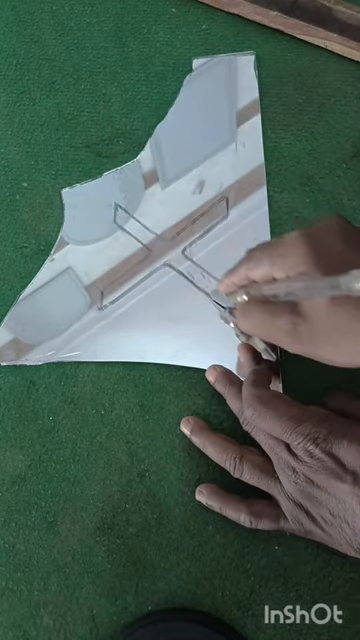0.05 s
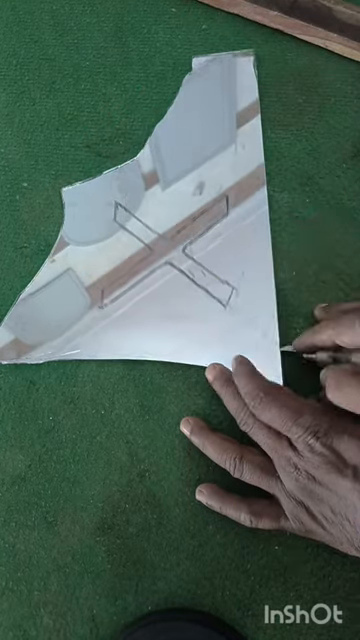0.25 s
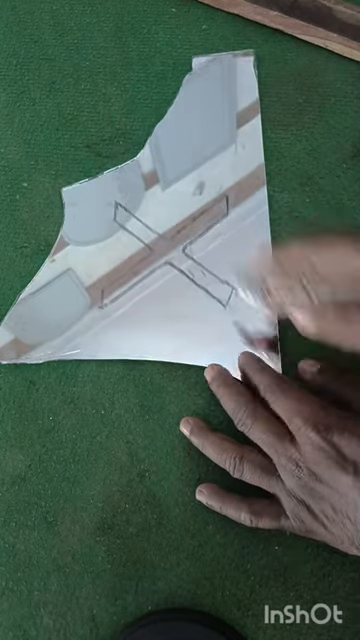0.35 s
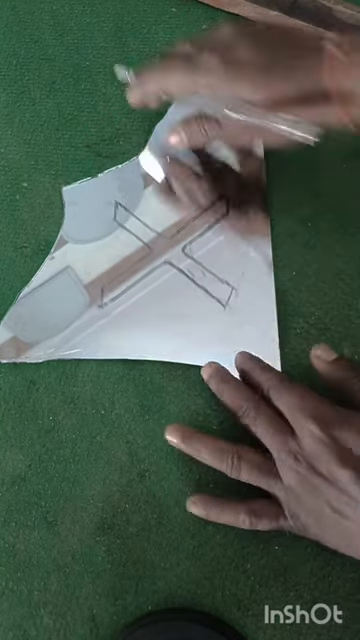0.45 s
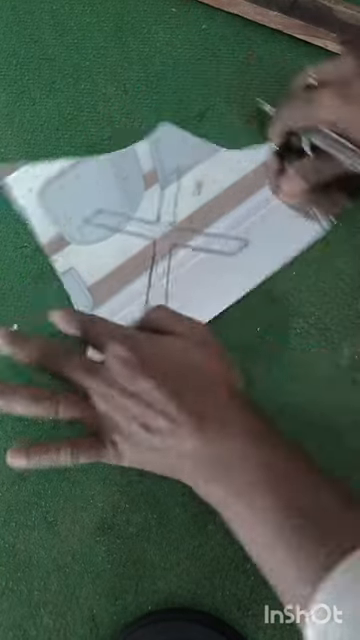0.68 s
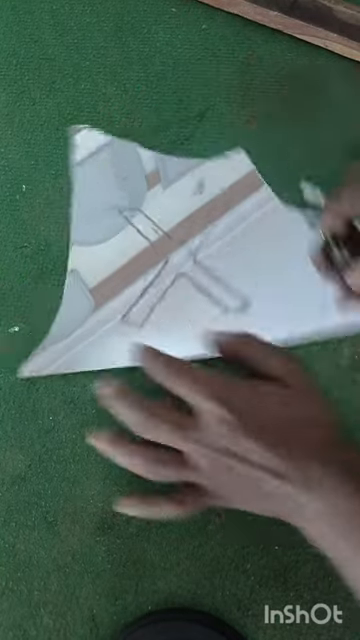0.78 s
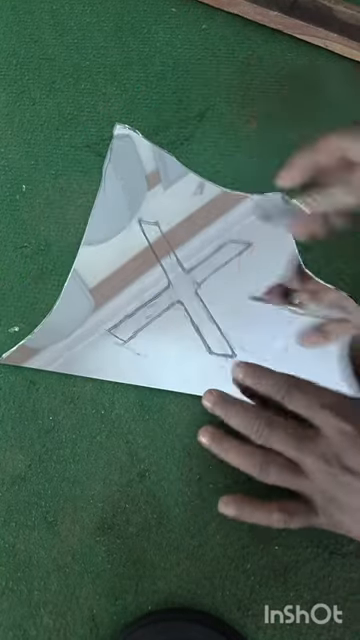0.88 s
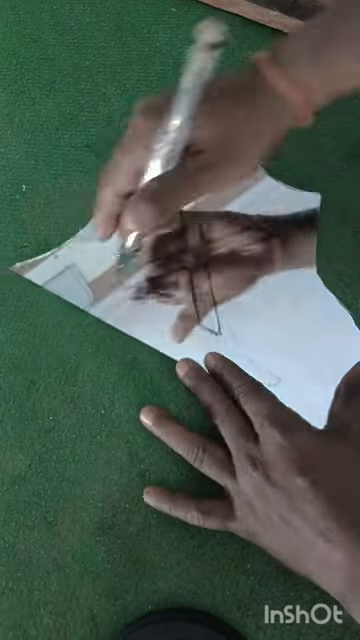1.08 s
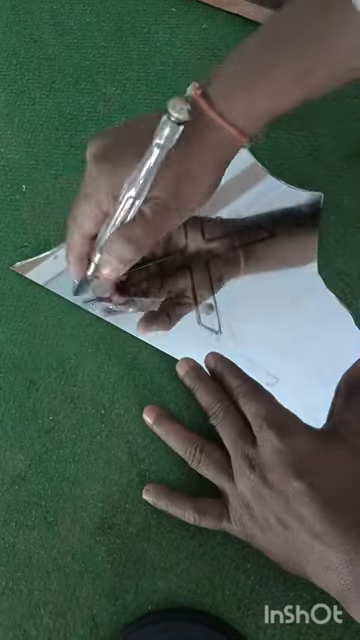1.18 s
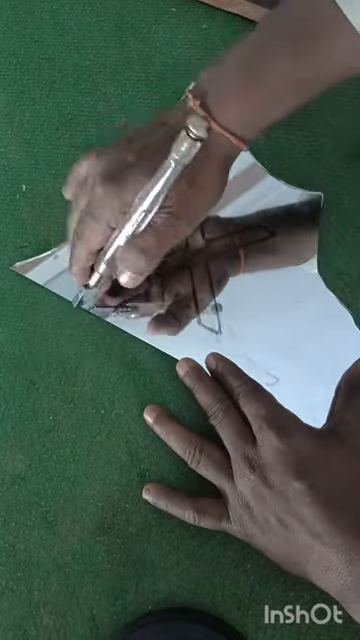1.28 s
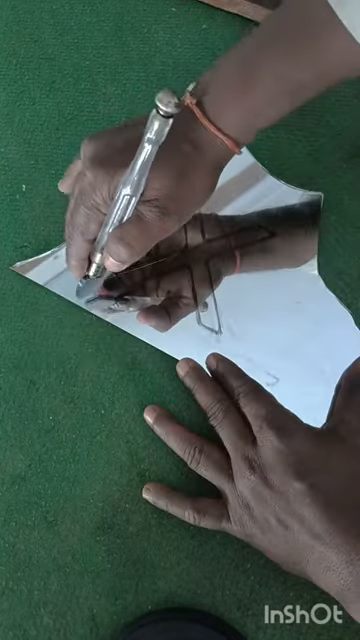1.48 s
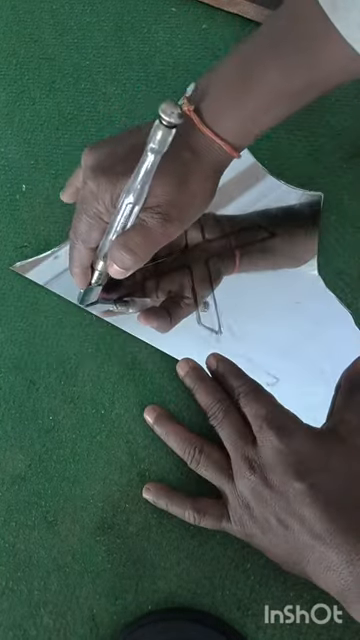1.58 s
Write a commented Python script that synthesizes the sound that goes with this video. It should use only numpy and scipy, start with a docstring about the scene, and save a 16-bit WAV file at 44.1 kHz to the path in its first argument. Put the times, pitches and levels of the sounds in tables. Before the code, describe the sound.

A glass cutter scratches briefly across a mirror and drops off the edge with a sharp crack and a table thud. Fingers turn the clinking glass on cloth, then the cutter is set down. Close, with faint street rumble.

```python
"""A workbench in a small room, heard close up by two spaced microphone ports, street rumble behind.
A wheel cutter chips the last of its score across a piece of mirror, drops off the edge with a crack
and a thud of the table, and bounces. A faint horn starts up far outside and sounds on and off.
Fingers pick at the mirror and turn it on the cloth, the glass ringing briefly at each touch.
Last, the cutter is set down again."""
import sys
import numpy as np
from scipy import signal
from scipy.io import wavfile

SR = 44100
rng = np.random.default_rng(int(sys.argv[2]) if len(sys.argv) > 2 else 0)


def unload_audio(sound):
    """Save the sound as a 16-bit wav file, at the path given as the first command line argument."""
    columns = np.transpose(np.atleast_2d(sound))
    # keep every value between -1 and 1, then stretch to whole-number steps
    steps = np.round(np.clip(columns, -1, 1) * 32767)
    wavfile.write(sys.argv[1], SR, steps.astype(np.int16))


N = 72765
TIME = np.arange(N) / SR
OWN_GRIT = 1.44   # grit heard at one port only, relative to the grit both share


def from_db(db):
    """Decibels to gain."""
    return 10 ** (np.asarray(db) / 20)


def unit_rms(x):
    """Scale to rms 1."""
    return x / np.sqrt(np.mean(x ** 2) + 1e-20)


def level_curve(rows):
    """Gain at every sample from (seconds, dB) points."""
    return from_db(np.interp(TIME, *np.transpose(rows)))


def at_hz(rows, hz):
    """Read (Hz, value) points on a log-frequency axis."""
    freqs, values = np.transpose(rows)
    return np.interp(np.log(hz), np.log(freqs), values)


def band(x, low_hz, high_hz):
    """Butterworth band-pass."""
    edges = np.clip([low_hz, high_hz], 10, .45 * SR)
    return signal.sosfilt(signal.butter(2, edges, "band", fs=SR, output="sos"), x)


def drift(rate_hz):
    """Slow random wander of rms 1."""
    hop, run_in = 40, 2000
    pole = np.exp(-2 * np.pi * rate_hz * hop / SR)
    white = rng.standard_normal(N // hop + run_in + 2)
    slow = signal.lfilter([1], [1, -2 * pole, pole * pole], white)[run_in:]
    return np.interp(np.arange(N) / hop, np.arange(len(slow)), unit_rms(slow))


def ring(force, hz, t60):
    """One damped mode: a unit click starts a dying sine of height about 1."""
    pole, angle = from_db(-60 / (t60 * SR)), 2 * np.pi * hz / SR
    return signal.lfilter([0, np.sin(angle)], [1, -2 * pole * np.cos(angle), pole * pole], force + 1e-18)


def grains(shape, per_s, spread_db):
    """Random clicks of uneven size and sign."""
    heights = from_db(spread_db * np.minimum(rng.exponential(1, shape), 4))
    signs = rng.choice([-1, 1], shape)
    return heights * signs * (rng.random(shape) < per_s / SR)


# How alike the two spaced ports hear noise. Each row: frequency in Hz, likeness from 0 to 1.
PORT_LIKENESS = [(60, 1), (250, 1), (500, 1), (1000, 0.1), (3000, 0), (12000, .3)]

def two_port_noise(spectrum, flicker_db):
    """Third-octave bands of noise at both ports, each flickering mostly on its own; rms 1."""
    out, common_drift = 0, drift(4)
    edges = 25 * 2 ** np.arange(0, 9.4, 1 / 3)
    white = rng.standard_normal((2, 2, N + SR // 5))   # with a run-in
    for k, (low, high) in enumerate(zip(edges, edges[1:])):
        mid, side = band(white[k % 2], low, high)[:, -N:]
        hz = np.sqrt(low * high)
        alike = at_hz(PORT_LIKENESS, hz)
        gain = from_db(at_hz(spectrum, hz) + flicker_db * (.3 * common_drift + drift(12)))
        out = out + gain * (np.sqrt(1 + alike) * mid + np.sqrt(1 - alike) * side * [[1], [-1]])
    return unit_rms(out)


# The street from indoors. Each row: frequency in Hz, relative spectral density in dB.
STREET_SPECTRUM = [(24, -54), (40, -10), (86, -12.5), (152, -2.5), (203, -4.5), (223, -14), (425, -14.5),
                   (593, -18.5), (809, -17.5), (1100, -26), (1240, -25), (1780, -28.5), (2940, -31),
                   (3640, -40.5), (12000, -65), (15600, -118), (22000, -120)]
# Its rise and fall at the bench. Each row: time in seconds, level in dB.
STREET_LEVEL = [(0, -42), (.2, -43), (.4, -43), (.55, -41), (.7, -42.5), (.85, -40), (1.0, -43.5),
                (1.12, -44), (1.25, -42), (1.37, -42.5), (1.45, -41), (1.65, -40)]

def street(port_lag_s=.0005):
    """Rumble comes through the walls and reaches the left port a little late."""
    rumble = level_curve(STREET_LEVEL) * two_port_noise(STREET_SPECTRUM, flicker_db=1.2)
    rumble[0] = np.interp(TIME - port_lag_s, TIME, rumble[0])
    return rumble


# The cutter's stroke, close to the microphone. Each row: time in seconds, level in dB.
STROKE_LEVEL = [(0.0, -39), (0.09, -36.5), (0.18, -36.5), (0.206, -45), (0.21, -48)]
# Where the scored glass hisses. Each row: centre in Hz, width in Hz, relative level in dB at the
# top of its swell, time of that top in seconds.
HISS_BANDS = [(1947, 240, -5, 0.0465), (3310, 260, 0, .07), (4330, 300, -12.5, .13), (4990, 410, 2.5, .14),
              (6090, 390, -7, 0.15), (7460, 510, 2, 0.088), (8320, 250, 0.5, .085), (9260, 400, -5, .16),
              (12200, 400, -40, .07), (14200, 300, -6, .15), (14950, 400, -5, .11)]

def scoring(chips_per_s=4000, swell_s=.04, swell_db=5.5, wander_db=2.0):
    """The wheel chips the glass in a dense grit that excites broad bands, each wandering in level."""
    shared = grains(N, chips_per_s, spread_db=2)
    grit = unit_rms(shared + OWN_GRIT * grains((2, N), chips_per_s, spread_db=2))
    hiss = from_db(1.5) * unit_rms(band(grit, 1900, 12000))   # wide bed under the bands
    for k, (hz, width, db, peak_s) in enumerate(HISS_BANDS):
        # A band swells as the wheel passes the spot that drives it.
        swell = np.exp(-.5 * ((TIME - peak_s) / swell_s) ** 2)
        gain = from_db(db + swell_db * (swell - 1) + wander_db * drift(5.1))
        hiss += (-1) ** k * gain * unit_rms(band(grit, hz - width / 2, hz + width / 2))
    on_glass = TIME < STROKE_LEVEL[-1][0]
    return unit_rms(hiss) * level_curve(STROKE_LEVEL) * on_glass


# Modes of the mirror lying on cloth. Each row: frequency in Hz, relative level in dB, t60 in seconds.
MIRROR_MODES = [(581, 4.5, 0.025), (829, 3.5, 0.023), (1019, 0, 0.017), (1217, -4, 0.034),
                (1840, -1, 0.011), (2399, 1.5, 0.023), (2530, -10, 0.015), (3015, -7, 0.021),
                (3265, 6, 0.016), (3630, 3, 0.016), (3860, 1.5, 0.037), (4973, 3, 0.01), (5950, -4, 0.017),
                (7316, -11, 0.034), (7830, -2, 0.019), (8590, -4.5, 0.031), (9600, -7.5, 0.017),
                (11400, -21, 0.0067)]
# Cutter and fingers on the mirror, close up. Each row: start in seconds, level in dB, rise and decay in
# seconds, low and high edge in Hz, gain of the dry crack in dB, left minus right port in dB.
MIRROR_CONTACTS = [(0.212, -24.5, .003, .003, 1530, 9300, -12, -24),
                   (0.2149, -1.5, 0.00052, 0.0024, 920, 8900, 12.5, 1.5),
                   (.2185, -3, 0.00029, 0.003, 436, 3070, 3, 0.5),
                   (.2255, -16, 0.0019, 0.046, 682, 5100, 23, 1),
                   (.2155, -27.5, .001, 0.0057, 10200, 15900, 27.5, -5),
                   (0.241, -34, 0.00092, 0.0039, 800, 5000, 4, 3),
                   (.3076, -19, 0.00039, 0.0012, 1510, 6600, -17, -6.5),
                   (0.3134, -24, 0.0002, 0.0043, 1430, 8300, 17, 8.5),
                   (0.3191, -26.5, 0.00035, 0.0021, 1000, 5100, 8, -10.5),
                   (0.488, -45, 0.0034, 0.027, 4030, 15000, 21, -3),
                   (0.5303, -36.5, 0.000036, 0.0011, 4370, 12800, 28, 10),
                   (0.563, -37, .001, 0.037, 400, 5800, 30, -1),
                   (.572, -34.5, 0.0056, .02, 396, 960, 33, -11),
                   (.5795, -18, 0.00033, 0.0016, 1110, 2000, 16, -1),
                   (0.602, -39.5, .001, 0.0034, 3020, 14200, 18.5, -5),
                   (.675, -53.5, .008, .015, 6000, 15000, 23, 0),
                   (.73, -50.5, .005, 0.009, 4970, 15140, 17, 0),
                   (1.034, -53, .003, 0.0064, 6000, 15000, 19.5, -7),
                   (1.44, -33.5, 0.0061, 0.009, 498, 994, 18, 0),
                   (1.5574, -29.5, .0003, .004, 1930, 6600, 26, 2.5),
                   (1.5575, -15.5, 0.00032, 0.0022, 690, 930, 21, 0),
                   (1.562, -34, 0.0015, 0.017, 710, 4650, 32, -5)]

def mirror_contacts(grains_per_s=8000, ring_db=-8.5, scatter_db=1.5):
    """Each contact is a burst of grit, heard dry as a crack and through the mirror's damped modes."""
    out, size = np.zeros((2, N + SR // 2)), SR // 3
    t = np.arange(size) / SR
    for start_s, db, rise, decay, low_hz, high_hz, crack_db, pan_db in MIRROR_CONTACTS:
        shared = grains(size, grains_per_s, spread_db=2.2)
        grit = shared + OWN_GRIT * grains((2, size), grains_per_s, spread_db=1.17)
        burst = grit * (1 - np.exp(-t / rise)) * np.exp(-t / decay)
        burst = band(burst / np.linalg.norm(burst, axis=1, keepdims=True), low_hz, high_hz)
        port_gains = from_db(rng.normal(0, scatter_db, (len(MIRROR_MODES), 2, 1)))
        ringing = sum(gain * from_db(mode_db + ring_db) * ring(burst, hz, t60)
                      for gain, (hz, mode_db, t60) in zip(port_gains, MIRROR_MODES))
        panned_gain = from_db([[db + pan_db / 2], [db - pan_db / 2]])
        start = int(start_s * SR)
        out[:, start:start + size] += panned_gain * (ringing + from_db(crack_db) * burst)
    return out[:, :N]


# Modes of the table top. Each row: frequency in Hz, relative level in dB, t60 in seconds.
TABLE_MODES = [(107.3, -17.5, 1), (161.9, -11.5, 0.049), (170, -9.5, 0.045), (209, -6, .15),
               (230, 0.5, 0.09), (286.6, 3, 0.16), (552, -6, .05), (825, -20.5, 0.1)]
# Pushes into the table, alike at both ports. Each row: start in seconds, level in dB, low-pass in Hz.
TABLE_PUSHES = [(0.2190, -13, 700), (0.2235, -23.5, 290), (0.2500, -33, 500), (0.2790, -28, 500),
                (0.2920, -24.5, 507), (0.3110, -23.5, 520), (0.5900, -38.5, 410), (1.5580, -41.5, 3030),
                (1.581, -39, 500)]

def table_thuds():
    """Soft pushes ring the table top."""
    force = np.zeros(N)
    for start_s, db, cut_hz in TABLE_PUSHES:
        click = np.zeros(N)
        click[int(start_s * SR)] = from_db(db)
        force += signal.sosfilt(signal.butter(2, cut_hz, fs=SR, output="sos"), click + 1e-18)
    return sum(from_db(db) * ring(force, hz, t60) for hz, db, t60 in TABLE_MODES)


# The horn's tone from far off. Each row: multiple of the pitch, relative level in dB.
HORN_PARTIALS = [(1, -13), (2, -2), (3, 0), (4, -2), (6, -12), (7, 4.5), (8, -1), (9, -10)]
# Its blasts, faint indoors. Each row: start in seconds, end in seconds, level in dB.
HORN_BLASTS = [(0.327, 0.474, -64), (.75, .9, -68), (0.887, 1.043, -64.5), (1.12, 1.3, -68),
               (1.3, 1.492, -67)]

def far_horn(pitch_hz=429, blur=.004, fade_s=.036):
    """A stack of partials, blurred by distance into narrow noise bands, swells in blasts."""
    blasts = sum(from_db(db) * np.clip(np.minimum(TIME - start, end - TIME) / fade_s, 0, 1)
                 for start, end, db in HORN_BLASTS)
    air = rng.standard_normal((2, N))
    low_hz, high_hz = pitch_hz * (1 - blur), pitch_hz * (1 + blur)
    tone = sum(from_db(db) * unit_rms(band(air, k * low_hz, k * high_hz)) for k, db in HORN_PARTIALS)
    return blasts * tone


# Handling on the cloth, near and quiet. Each row: time in seconds, level in dB.
CLOTH_LEVEL = [(0.45, -85), (0.54, -59.5), (0.66, -62), (0.8, -66), (0.894, -77), (1.03, -63),
               (1.178, -79.5), (1.408, -75), (1.562, -65.5), (1.65, -69)]
# The cloth's hiss. Each row: frequency in Hz, relative spectral density in dB.
CLOTH_SPECTRUM = [(2500, -17), (4000, 13.5), (8000, 0), (11000, -5.5), (15500, -6.5)]

def cloth_brushing():
    """Mirror and fingers rub over the cloth with a patchy, high hiss."""
    hiss = level_curve(CLOTH_LEVEL) * two_port_noise(CLOTH_SPECTRUM, flicker_db=3.5)
    handling = TIME > CLOTH_LEVEL[0][0]
    return band(hiss * handling, 1900, 17000)


def room(source, t60_s=.29, wall_cut_hz=4030):
    """Near walls send the sound back: eight echo loops a port, duller on every round."""
    out, pole = np.zeros((2, N)), np.exp(-2 * np.pi * wall_cut_hz / SR)
    lags = (rng.uniform(.008, .03, 16) * SR).astype(int)
    for k, lag in enumerate(lags):
        loop, state = source.copy(), [0.]
        gain = from_db(-60 * lag / SR / t60_s)
        for i in range(lag, N, lag):
            echo, state = signal.lfilter([gain * (1 - pole)], [1, -pole], loop[i - lag:i], zi=state)
            loop[i:i + lag] += echo[:N - i]
        out[k % 2] += (loop - source) * (-1) ** (k // 2)
    return out


def scene():
    """Glass, table and cloth up close, street and horn beyond the walls; only the glass echoes."""
    glass = mirror_contacts() + scoring()
    cloth, rumble = cloth_brushing(), street()
    echoes = from_db(-15) * room(glass.mean(axis=0))
    return glass + table_thuds() + echoes + cloth + rumble + far_horn()


def record(dry):
    """The microphone rounds the peaks, drops the deep bass and cuts the very top."""
    ceiling, low_cut_hz, high_cut_hz = 1.3, 75.6, 15720
    rounded = ceiling * np.tanh(dry / ceiling)
    thinned = signal.sosfilt(signal.butter(2, low_cut_hz, "high", fs=SR, output="sos"), rounded)
    return signal.sosfilt(signal.ellip(12, .5, 70, high_cut_hz, fs=SR, output="sos"), thinned)


dry = scene()
out = record(dry)
unload_audio(out)
```